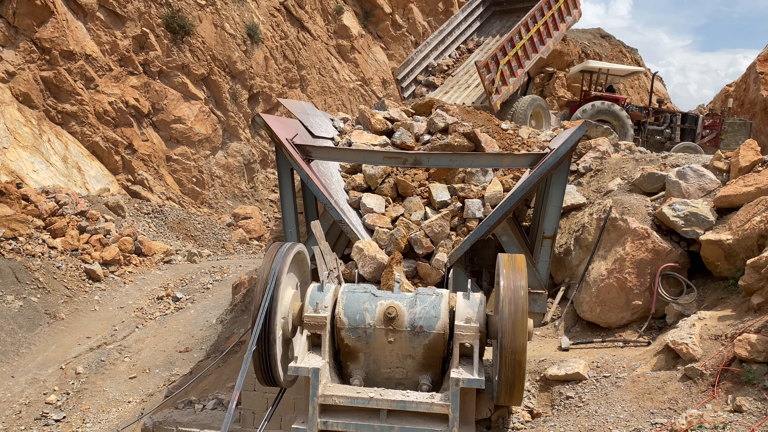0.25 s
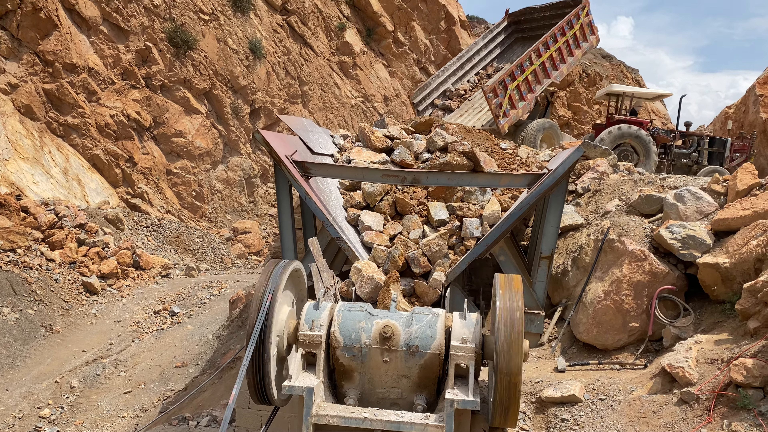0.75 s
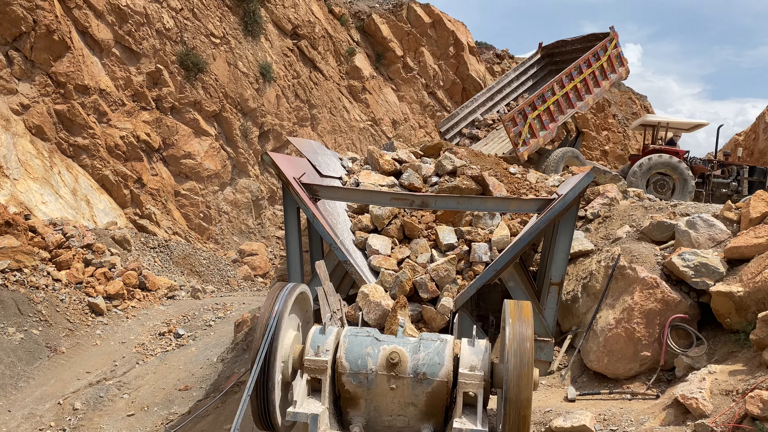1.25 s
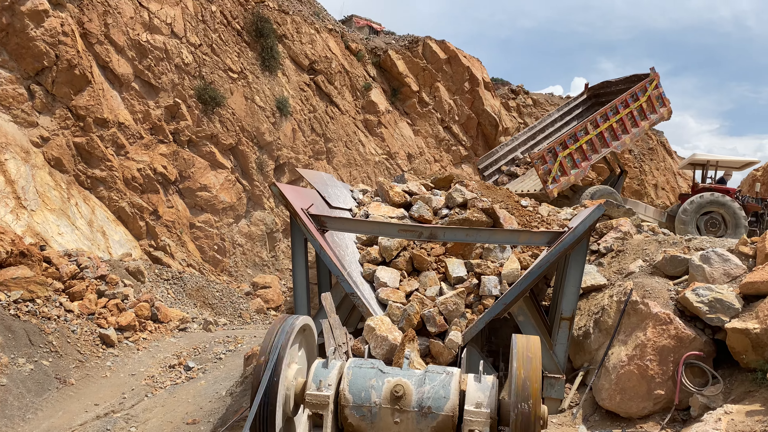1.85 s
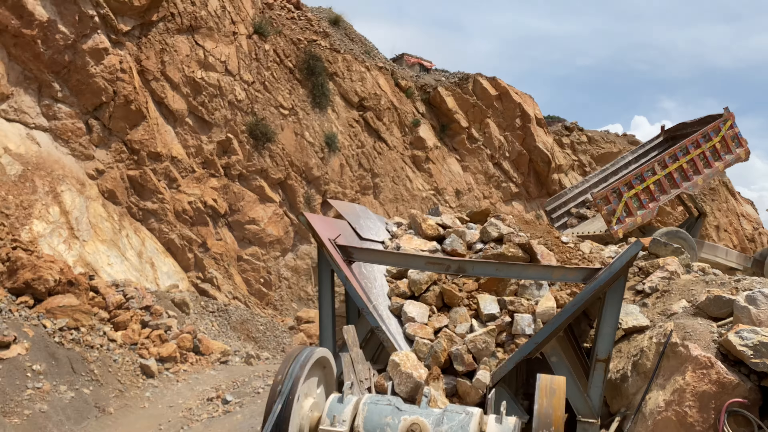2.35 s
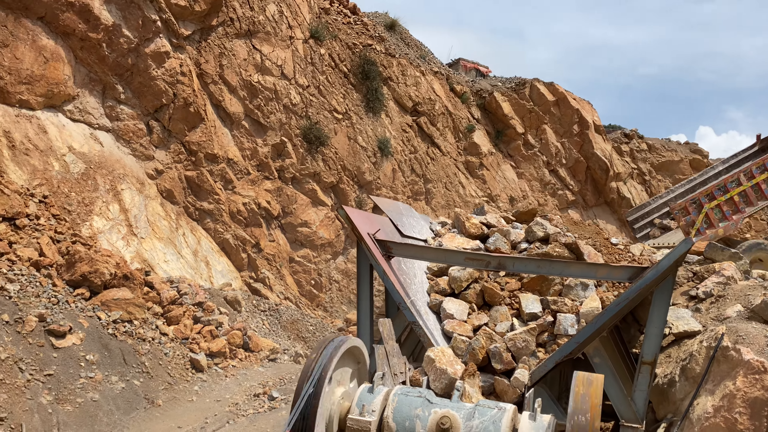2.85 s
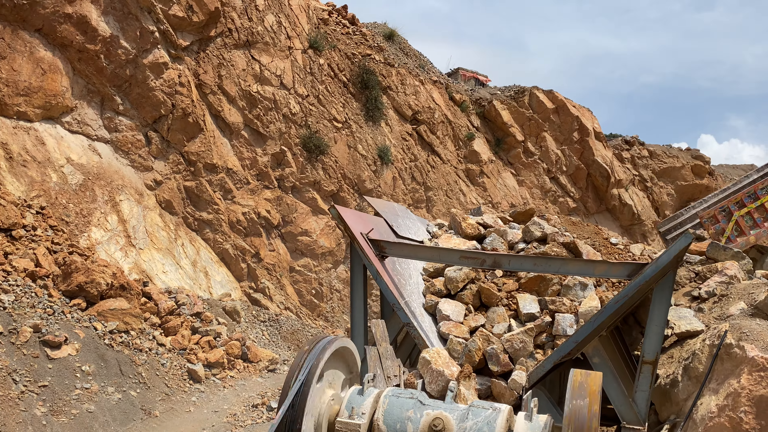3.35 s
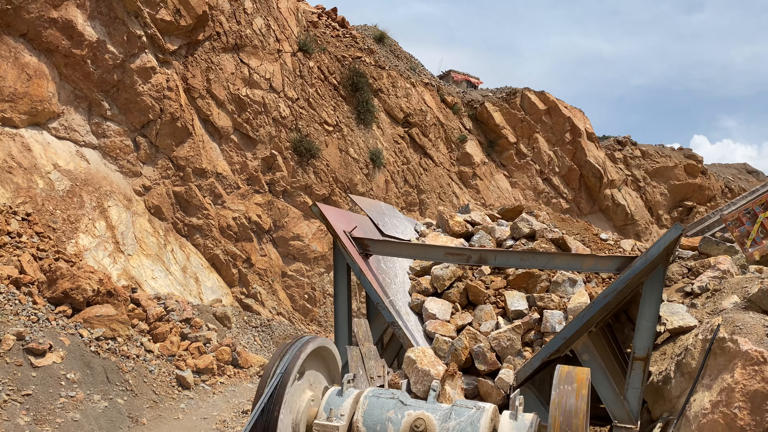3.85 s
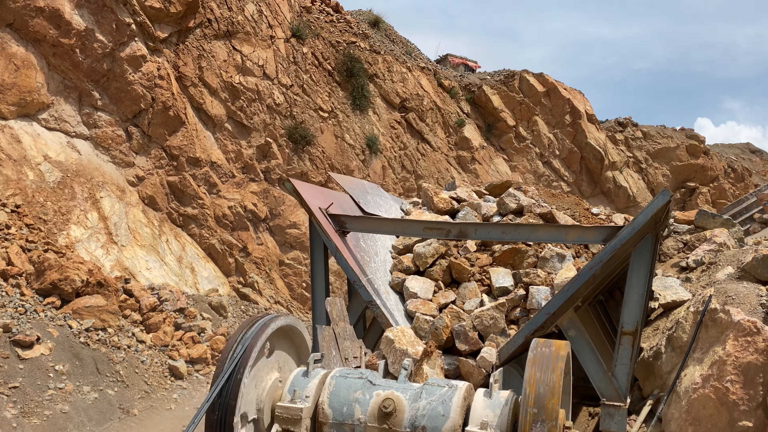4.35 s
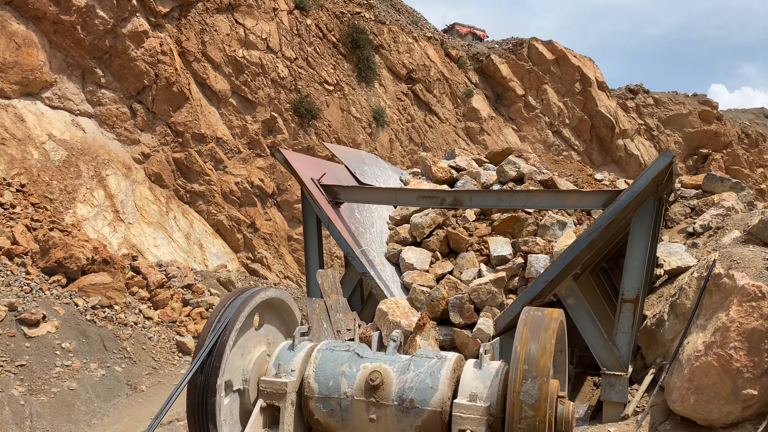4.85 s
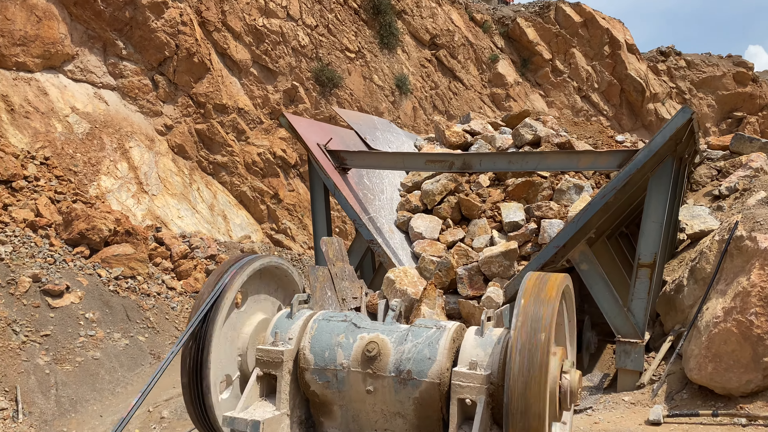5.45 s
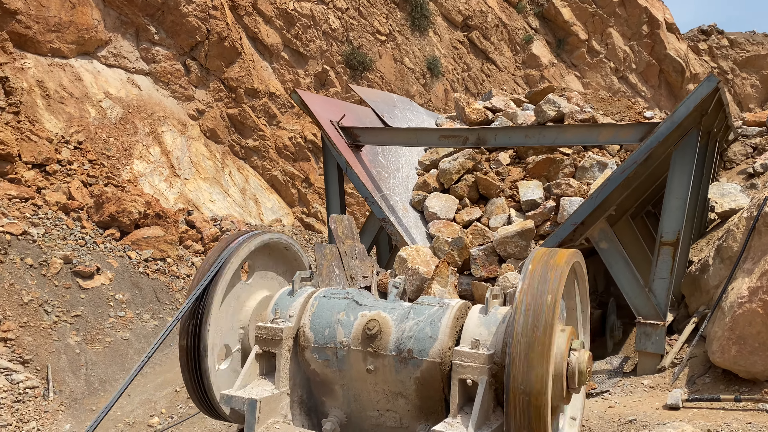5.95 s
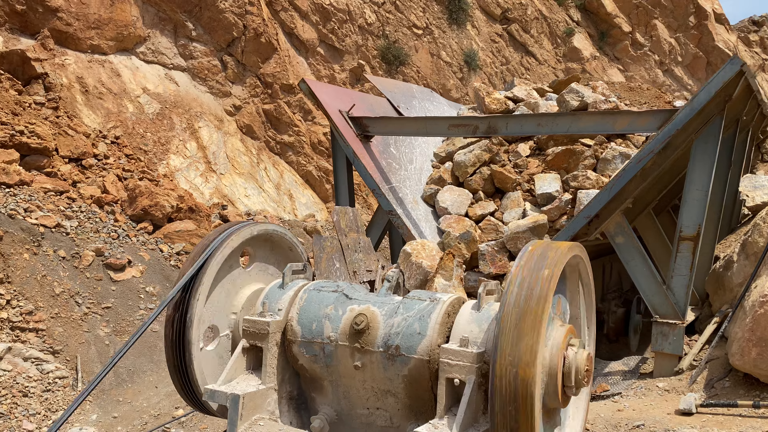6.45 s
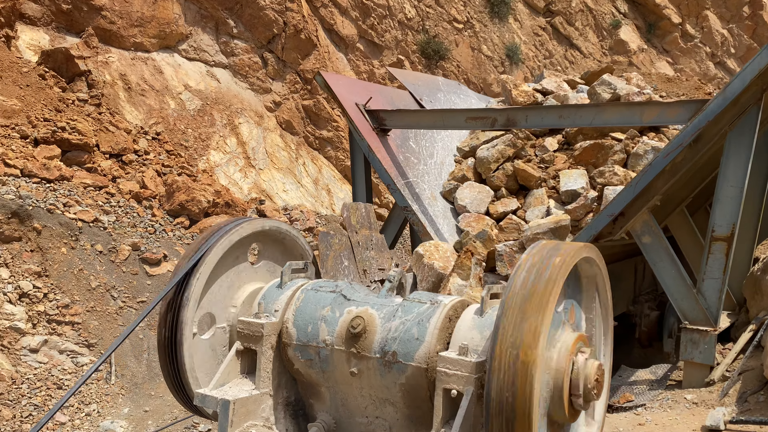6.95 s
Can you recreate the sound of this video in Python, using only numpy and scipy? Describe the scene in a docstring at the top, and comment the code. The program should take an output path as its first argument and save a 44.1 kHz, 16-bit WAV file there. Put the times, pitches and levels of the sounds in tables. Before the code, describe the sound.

Stone crunches and cracks in a running jaw crusher, about four strokes a second, over rumbling machinery that draws gradually nearer.

```python
"""A jaw crusher chews rock in an open quarry, four strokes a second, as the listener draws nearer.
Stone crunches between the steel jaws and rings the frame, and boulders take heavy blows.
Rocks crack, burst or knock, and a loose plate clinks. With each stroke the machine ticks and grit hisses.
Underneath, the flywheels and frame shake the ground while the motor and belts hum and whine."""
import sys
import numpy as np
from scipy import signal
from scipy.fft import rfft, irfft, next_fast_len
from scipy.io import wavfile
from scipy.ndimage import uniform_filter1d

SR = 44100
rng = np.random.default_rng(int(sys.argv[2]) if len(sys.argv) > 2 else 0)


def generate_wav(sig):
    """Save sig (samples, or channels by samples) to the path in sys.argv[1] as 16-bit PCM at SR."""
    pcm = np.round(np.clip(np.atleast_2d(sig).T, -1, 1) * 32767).astype(np.int16)
    wavfile.write(sys.argv[1], SR, pcm)


N = 317079  # samples, about 7.2 seconds
PATH_TURNS = np.array([[0], [.25]])  # sound takes two paths; a ring arrives a quarter cycle apart


# Jaw strokes, biting early_s before time_s: time_s, rasp_db, early_s, crunch_db, boom_db, grit_db
JAW_STROKES = [(0.12, -36.5, 0.036, -21, -23, -39), (0.369, -38, 0.0011, -21, -22, -31),
               (0.62, -36, 0.051, -25.5, -21.5, -28), (0.87, -39, 0.031, -22.5, -19.5, -30),
               (1.13, -40, 0.046, -24, -20, -30.5), (1.37, -42, 0.034, -24, -23.5, -31.5),
               (1.62, -38.5, 0.025, -20.5, -16.5, -29), (1.869, -36, 0.013, -20, -22, -30),
               (2.1, -39, -0.0072, -18.5, -23, -41), (2.36, -39, 0.028, -24.5, -19, -31),
               (2.61, -39, 0.0091, -21, -23.5, -31.5), (2.86, -44, 0.046, -19.5, -19.5, -28.5),
               (3.1, -39, 0.037, -22, -20.5, -34), (3.35, -38, 0.017, -30, -20.5, -29),
               (3.59, -38.5, 0.0019, -21.5, -20, -30.5), (3.841, -38, 0.015, -25, -20, -29.5),
               (4.09, -40, 0.013, -22.5, -21.5, -30), (4.34, -43, 0.034, -22.5, -24, -28.5),
               (4.58, -38.5, 0.025, -20.5, -19, -30), (4.82, -38, 0.023, -26, -17, -35),
               (5.079, -39, 0.033, -19.5, -19, -26.5), (5.32, -39, 0.026, -18.5, -17, -34),
               (5.56, -38.5, 0.014, -30, -23, -30), (5.82, -41, 0.012, -17.5, -15, -28),
               (6.06, -38, 0.022, -18.5, -19.5, -29), (6.31, -39, 0.0096, -18.5, -15.5, -31),
               (6.53, -37.5, 0.0025, -32, -15.5, -36), (6.789, -38, 0.02, -18.5, -17, -31),
               (7.05, -41, 0.043, -20.5, -27, -29.5)]
# Tone of breaking stone: frequency_hz, level_db
CRUNCH_TONE = [(250, -12), (420, -5), (550, 0.5), (800, -1.5), (1200, -9), (1600, -19.5), (2500, -52),
               (6000, -90)]
# Tone of the deep boom of a bite: frequency_hz, level_db
BOOM_TONE = [(90, -8), (140, -4.5), (200, 0), (300, -4.5), (420, -7.5), (520, -11.5), (800, -62),
             (2000, -90)]
# Force that shakes the frame: frequency_hz, level_db
FRAME_FORCE = [(60, -35), (150, 15), (1500, 2), (4000, -13.5), (9000, -80)]
# Notes of the steel frame and hopper: pitch_hz, width_hz, far_db, near_db
FRAME_NOTES = [(154.5, 48, -11.5, -18), (216.4, 24, -16, -13), (270.2, 21.6, -6.5, -8.5),
               (403, 42, -24, -5.5), (538, 20, -26, -10), (775, 35, -9, -56), (917, 9.8, -88, -6.5),
               (1120, 140, -36, -9.5)]

def jaw_crunch():
    """Stone breaks between the jaws and rings the steel frame."""
    time_s, _, early_s, crunch_db, boom_db, _ = np.transpose(JAW_STROKES)
    boom = swell("boom", time_s - early_s, boom_db, build_s=0.038, release_s=0.05)
    crush = swell("crunch", time_s - early_s, crunch_db, build_s=0.057, release_s=0.037)
    chunks = gain_of(-4) * grains(CRUNCH_TONE, per_s=800, spread_db=3.8, fade_s=0.34)
    chunks += gain_of(-9) * pebbles(CRUNCH_TONE, low_hz=399.3, high_hz=1706, spread_db=3.9, width_hz=22.3)
    shake = grains(FRAME_FORCE, per_s=800, spread_db=1.7, fade_s=0.041)
    steel = np.zeros((2, N))
    for k, (hz, width_hz, far_db, near_db) in enumerate(FRAME_NOTES):
        push = boom if k < 4 else crush  # the four lowest notes follow the boom
        steel += push * gain_of(by_distance(far_db, near_db)) * evened(ring(shake, hz, width_hz))
    thuds = grains(BOOM_TONE, per_s=800, spread_db=4.4, fade_s=0.17)
    return boom * thuds + crush * chunks + steel


# Heavy blows on boulders: start_s, level_db, pitch_hz, crush_db, fade_s
BOULDER_BLOWS = [(0.068, -13, 232, -10, 0.091), (.324, -14, 168, -15, .2), (.584, -7.5, 246, -13.5, 0.25),
                 (.768, -16, 291, -17, 0.22), (1.056, -14.5, 272.4, -10, 0.41), (1.304, -19, 169, -1, 0.3),
                 (1.332, -8, 292, -20, 0.091), (1.438, -13, 177, -24, 0.23), (1.826, -17.5, 254, 2, 0.11),
                 (2.084, -1.5, 261, -16, 0.22), (2.125, -15, 252, -23, 0.3), (2.33, -11, 256, -22, 0.23),
                 (2.586, -3, 255, -17, 0.084), (2.805, -9.5, 268, -12, 0.18), (3.021, -12, 228, -10, 0.16),
                 (3.073, -6.5, 139, -11, 0.12), (3.106, -11, 261, -23, 0.11), (3.331, -7, 115, -25, 0.07),
                 (3.313, -16, 270, -4, 0.14), (3.549, -11.5, 254, -9.5, 0.17), (3.76, -10.5, 233, -14, 0.1),
                 (3.798, -7, 211, -8.5, 0.095), (3.838, -12, 134, -28, 0.062), (3.994, -12, 383, -8, 0.12),
                 (4.059, -12, 283, -7, 0.091), (4.292, -6.5, 221, -9.5, 0.095),
                 (4.514, -20, 231, -2.5, 0.18), (4.783, -13, 230, -12, 0.43),
                 (4.913, -11, 156.3, -21, 0.16), (4.98, -13, 382, -5, 0.1), (5.064, -2.5, 247, -13, 0.07),
                 (5.074, 3.5, 100, -30, 0.1), (5.129, -14.5, 221, -11, 0.23), (5.245, -10, 550, -19, 0.11),
                 (5.305, -14.5, 230, -19, .16), (5.478, -7.5, 203, -14, 0.14),
                 (5.533, -6, 261.6, -13.5, 0.23), (5.614, -9, 151, -19, 0.19), (5.881, -13, 272, -18, 0.15),
                 (5.937, -14.5, 246, -10, 0.33), (6.03, -14.5, 262, -21, 0.84),
                 (6.235, -3, 289, -12, 0.073), (6.374, -18.5, 328, -0.5, 0.3),
                 (6.503, -9.5, 530, 1.5, 0.086), (6.54, -11, 553, -19, 0.12), (6.598, -16, 404, -22, 0.15),
                 (6.714, -19, 229, 3, 0.12), (6.751, -15, 290, -8, 0.13), (6.786, -6, 226, -12, 0.13)]
# Tone of stone crushed by a blow: frequency_hz, level_db
CRUSH_TONE = [(150, -41), (400, -4), (800, 0), (1300, -1), (2000, -12.5), (4000, -36), (9000, -80)]

def boulder_blows():
    """The force builds over a few milliseconds, rings a low note of the jaw and crushes stone."""
    out, t = np.zeros((2, N)), np.arange(6000) / SR
    for start_s, level_db, hz, crush_db, fade_s in BOULDER_BLOWS:
        swing = np.sin(2 * np.pi * (hz * t + PATH_TURNS))
        thud = (1 - np.exp(-t / 0.0037)) * fade(t, fade_s) * swing
        crush = gain_of(crush_db) * puff(CRUSH_TONE, 0.0031, 1.25 * fade_s, len(t))
        add(out, start_s, gain_of(level_db) * (thud + crush))
    return out


# Notes of a struck stone: pitch_ratio, strength
STONE_NOTES = [(0.698, 0.3), (.85, 0.26), (0.996, 1), (1.079, 0.41), (1.33, 0.25), (1.6, 0.37)]
# Notes of the loose plate: pitch_hz, level_db, fade_s
PLATE_NOTES = [(2110, -12, .1), (2800, 0, 0.11), (3300, -2, 0.1), (3550, -1, 0.11), (3750, -4, 0.08),
               (4130, 0, 0.08), (5310, 0, 0.15), (5440, -1, 0.1)]

def crack(hz, tilt_db, clink_db, ring_db, rise_s, fade_s, tone, clear_db):
    """One rock snaps, rings briefly and sets the loose plate rattling."""
    t = np.arange(4800) / SR
    tilted = [(f, db + tilt_db * np.log2(f / 2500)) for f, db in tone]
    sharp_front = 1 + .5 * np.exp(-t / 0.00039)
    snap = puff(tilted, rise_s, fade_s, len(t)) * sharp_front
    rough = sum(strength * ring(snap, hz * ratio, width_hz=330) for ratio, strength in STONE_NOTES)
    rough *= np.std(snap) / np.std(rough)
    clear = sum(strength * gain_of(tilt_db * np.log2(ratio)) * note(hz * ratio, t)
                for ratio, strength in STONE_NOTES)
    clear *= gain_of(clear_db) * np.minimum(t / rise_s, 1) * fade(t, fade_s / 2)
    rock = snap + gain_of(ring_db) * (rough + clear)
    phases = 2 * np.pi * rng.random((len(PLATE_NOTES), 2, 1))
    # the plate sits and is hit a little differently each time
    nudges = rng.standard_normal((len(PLATE_NOTES), 2)) * (2.5, .008)
    clink = np.zeros((2, len(t)))
    for (plate_hz, db, ring_s), phase, (nudge_db, detune) in zip(PLATE_NOTES, phases, nudges):
        swing = np.sin(2 * np.pi * plate_hz * (1 + detune) * t + phase)
        clink += gain_of(db + nudge_db) * fade(t, ring_s) * swing
    wobble = evened(uniform_filter1d(rng.standard_normal(len(t)), size=150))
    rattle = np.minimum(t / 0.0019, 1) * (1 + 0.49 * np.tanh(wobble))
    return gain_of(-9.5) * rock + gain_of(clink_db) * rattle * clink


# Rocks that split: start_s, level_db, pitch_hz, tilt_db_per_octave, clink_db
ROCK_SPLITS = [(0.0672, -23, 3040, -4, -28), (0.1215, -23.5, 3280, -3, -9), (0.3726, -21.5, 2960, -1, -16),
               (0.796, -17.5, 1940, -16, -27), (0.8236, -18.5, 2110, -7, -32),
               (0.878, -21.5, 1920, -3, -31), (1.0635, -23, 1930, -9, -19),
               (1.1516, -19.5, 2260, -5.5, -31), (1.3105, -24, 3700, -2, -30), (1.404, -37, 2200, -4, -30),
               (1.5277, -20, 2100, -5.5, -27), (1.816, -17, 2210, -17, -30), (2.0067, -17.5, 1920, -5, -35),
               (2.0737, -14.5, 3610, -5.5, -28), (2.2751, -24.5, 2470, -2, -25),
               (2.5189, -22.5, 2500, -3, -28), (2.584, -30, 2460, 2, -26), (2.835, -28, 2430, 6, -33),
               (3.069, -18.5, 3280, -10, -30), (3.288, -15, 2506, -9, -32), (3.5515, -19, 1890, -3, -31),
               (3.802, -27, 1990, -2, -7.5), (4.187, -20.5, 1890, -6, -32), (4.3134, -21.5, 1880, -3, -31),
               (4.4849, -16.5, 2190, -5.5, -31), (4.522, -24, 2030, -7, -33), (4.7927, -23, 2740, -8, -16),
               (4.932, -23, 2260, -2, -24), (5.062, -30, 1980, 8, -27), (5.228, -20.5, 3340, -5, -19),
               (5.4784, -20, 2360, -5.5, -14), (5.726, -14, 2320, -21, -17), (5.7853, -18, 2080, -7, -25),
               (6.02, -21, 2650, -8, -30), (6.221, -19, 2060, -4.5, -19), (6.24, -15, 3740, -9, -28),
               (6.364, -17, 2110, -3.5, -25), (6.4632, -19, 2300, -5, -22), (6.4953, -14, 2140, -5.5, -21),
               (6.6368, -21.5, 2123, -2.5, -15), (6.711, -26, 2350, -5, -7), (6.7622, -18.5, 2140, -3, -11),
               (6.9024, -17.5, 2110, -10, -13), (6.953, -20.5, 2100, -3, -16),
               (7.027, -15, 1960, -3.5, -15), (7.088, -13.5, 2670, -9, -30), (7.171, -16, 2100, -2.5, -13)]
# Tone of a split: frequency_hz, level_db
SPLIT_TONE = [(300, -36), (800, -3), (1500, -1), (3000, -3), (5000, 0.5), (7000, -6.5), (11000, -10.5),
              (16000, -57)]
# Rocks that burst: start_s, level_db, pitch_hz, tilt_db_per_octave, clink_db, ring_db,
# rise_s, fade_s, splinters_db, treble_db
ROCK_BURSTS = [(0.9135, -12.5, 2870, -3, -41, -1.5, 0.003, 0.31, -32, -22),
               (3.2089, -12, 2635, -2, -34, 3, 0.001, 0.22, -33, -18),
               (3.9092, -9.5, 2600, 1, -25, 0, 0.0011, 0.11, -23.5, 3)]
# Tone of a burst: frequency_hz, level_db
BURST_TONE = [(600, -40), (1200, 1), (1900, 0), (3000, -5), (5000, -4), (7000, -11.5), (11000, -8.5),
              (16000, -57)]

def rock_cracks():
    """Many rocks split in the jaws, and a few burst."""
    out = np.zeros((2, N))
    for start_s, level_db, *rock in ROCK_SPLITS:
        split = crack(*rock, ring_db=-4, rise_s=0.00031, fade_s=0.33, tone=SPLIT_TONE, clear_db=0)
        add(out, start_s, gain_of(level_db) * split)
    for start_s, level_db, *rock, _, _ in ROCK_BURSTS:
        add(out, start_s, gain_of(level_db) * crack(*rock, tone=BURST_TONE, clear_db=-5.5))
    return out


# Short pitched knocks: start_s, level_db, pitch_hz, fade_s
SHORT_KNOCKS = [(0.1274, -22, 2250, 0.044), (0.773, -23, 3280, 0.05), (0.917, -19, 2010, 0.08),
                (0.92, -17.5, 1325, 0.12), (0.921, -20, 3120, 0.07), (3.9095, -17, 4100, 0.046),
                (3.909, -13, 2600, 0.06), (3.2093, -11, 1850, 0.07), (3.911, -21, 6500, 0.04),
                (3.916, -18, 2230, 0.06), (1.065, -26, 2760, 0.037), (1.278, -18, 2260, 0.05),
                (1.4042, -15, 2090, 0.054), (1.779, -18, 2240, 0.046), (2.272, -19, 2450, 0.05),
                (2.7655, -20, 2330, 0.05), (3.0126, -21, 2320, 0.05), (3.5044, -29, 2270, 0.043),
                (3.9988, -21, 2144, 0.05), (4.241, -16, 2256, 0.046), (4.484, -24, 2156, 0.044),
                (4.7345, -18, 2330, 0.054), (4.9152, -19, 2230, 0.035), (5.479, -14.5, 2305, 0.059),
                (5.9694, -18, 2480, 0.05), (6.3292, -27, 2210, 0.045), (6.464, -21, 2360, 0.05),
                (6.7113, -25, 4240, 0.06), (5.365, -24, 2980, 0.07), (5.4275, -21, 2230, 0.07),
                (5.526, -19, 1600, 0.07), (5.674, -24, 1730, 0.064), (5.871, -26, 2000, 0.08),
                (5.924, -17, 1585, 0.088), (5.997, -19, 1740, 0.08), (6.084, -14, 1500, 0.091),
                (6.13, -17, 1750, 0.05), (6.299, -18, 1660, 0.08), (6.573, -21, 1550, 0.08),
                (6.94, -21, 2100, 0.08), (6.973, -24, 2780, 0.1), (7.009, -21, 1570, 0.08),
                (7.045, -19, 2120, 0.08), (7.115, -23, 2710, 0.15), (0.072, -8, 746, 0.088),
                (0.525, -10, 610, 0.063), (0.586, -18, 670, 0.11), (1.011, -11, 580, 0.074),
                (1.31, -12.5, 1206, 0.064), (1.329, -11, 540, 0.096), (1.349, -10, 860, 0.068),
                (1.552, -8, 369, 0.095), (2.092, -8, 900, 0.1), (2.11, -12, 530, 0.09),
                (2.316, -9, 403, 0.11), (2.574, -10, 843, 0.086), (3.069, -17, 390, 0.088),
                (3.552, -15, 784, 0.08), (3.8, -6.5, 826, 0.07), (3.803, -16, 1340, 0.063),
                (4.289, -13, 580, 0.062), (4.79, -11, 400, 0.08), (5.028, -8, 405, 0.11),
                (5.062, -10, 910, 0.06), (5.078, -9, 546, 0.065), (5.78, -13, 920, 0.09),
                (5.799, -7.5, 742, 0.099), (5.829, -6, 620, 0.08), (6.192, -20, 561, 0.07),
                (6.239, -0.5, 404, 0.068), (6.489, -12, 586, 0.088), (6.552, -1, 590, 0.054),
                (6.829, -9, 550, 0.061), (6.919, -7.5, 450, 0.13)]

def short_knocks():
    """The machine ticks each stroke, bursting rocks ring, stones knock: brief notes in puffs of noise."""
    out, t = np.zeros((2, N)), np.arange(2400) / SR
    for start_s, level_db, hz, fade_s in SHORT_KNOCKS:
        clear = sum(strength * note(hz * ratio, t) for ratio, strength in STONE_NOTES)
        noise = evened(ring(rng.standard_normal((2, len(t))), hz, 0.4 * hz))
        loudness = gain_of(level_db) * np.minimum(t / .0025, 1) * fade(t, fade_s)
        add(out, start_s, loudness * (gain_of(-6.5) * clear + gain_of(-12) * noise))
    return out


# Tone of sliding gravel: frequency_hz, level_db
GRAVEL_TONE = [(900, 2), (1400, 3.5), (2000, 2), (3000, -2.5), (4500, -6), (5800, -8.5), (7000, -52),
               (9000, -50), (14000, -80)]
# Tone of dust and splinters: frequency_hz, level_db
DUST_TONE = [(4500, -17), (6300, 1.5), (7000, 0), (9000, -4), (11000, -4.5), (13000, -7.5), (15000, -9.5),
             (17000, -41)]

def sliding_grit():
    """Gravel tumbles and slides with each stroke; the finest dust rasps on the jaw plates."""
    time_s, rasp_db, early_s, _, _, grit_db = np.transpose(JAW_STROKES)
    gravel = grains(GRAVEL_TONE, per_s=1700, spread_db=0.45, fade_s=0.057)
    gravel += gain_of(-9.5) * pebbles(GRAVEL_TONE, low_hz=891.4, high_hz=5985, spread_db=3, width_hz=30.6)
    dust = grains(DUST_TONE, per_s=2200, spread_db=0.73, fade_s=0.061)
    # the highest hiss grows duller as time goes on
    dull = colour(dust, lambda hz: 1 / np.sqrt(1 + (hz / 12000) ** 8))
    dust = dull + gain_of(by_distance(-.7, -27)) * (dust - dull)
    slide = swell("grit", time_s - early_s, grit_db, build_s=0.049, release_s=0.056)
    rub = swell("rasp", time_s, rasp_db - 6, build_s=0.067, release_s=0.023)
    return slide * gravel + rub * dust


# The two hisses in every stroke: early_s, above_rasp_db
STROKE_HISSES = [(0.017, 6.5), (0.0078, 2.5)]
# Tone of the highest part of a hiss: frequency_hz, level_db
TREBLE_TONE = [(9000, -40), (11500, 3), (13000, 7), (15000, -4), (17000, -12)]

def splinters():
    """Fine splinters hiss twice a stroke and when a rock bursts; the highest treble dies sooner."""
    out = np.zeros((2, N))
    stroke_treble_db = by_distance(-13, -10)
    hisses = [(time_s - early_s, 0.0096, 0.14, rasp_db + above_db, stroke_treble_db[round(time_s * SR)])
              for time_s, rasp_db, *_ in JAW_STROKES for early_s, above_db in STROKE_HISSES]
    for start_s, *_, rise_s, fade_s, level_db, treble_db in hisses + ROCK_BURSTS:
        hiss = puff(DUST_TONE, rise_s, fade_s, samples=3600)
        hiss += gain_of(treble_db) * puff(TREBLE_TONE, rise_s, 0.53 * fade_s, samples=3600)
        add(out, start_s, gain_of(level_db) * hiss)
    return out


# Lumps of ground shaking: time_s, level_db, pitch_hz
GROUND_LUMPS = [(0.158, -26, 118), (0.25, -38, 65.0), (0.381, -20, 127), (0.667, -15, 67.0),
                (0.901, -16.5, 110), (1.12, -23, 65.0), (1.339, -20, 106), (1.47, -16, 94.5),
                (1.631, -19, 111), (1.877, -17, 107), (2.131, -18, 113), (2.2, -19, 83.0), (2.401, -17, 80),
                (2.47, -16.5, 56.5), (2.711, -17, 80.3), (2.941, -26, 71.0), (3.097, -13, 55.7),
                (3.35, -21, 103), (3.501, -24, 67.0), (3.649, -18, 104), (3.84, -16, 102), (4.11, -14, 102),
                (4.408, -25, 91), (4.559, -15.5, 119.5), (4.85, -16, 100), (5.088, -9, 98),
                (5.202, -18, 92.5), (5.359, -16, 117), (5.419, -21, 73.6), (5.642, -17, 77.2),
                (5.829, -14.5, 59.5), (5.899, -15, 85.5), (6.111, -13, 89), (6.389, -8.5, 92),
                (6.588, -11.5, 96), (6.831, -14.5, 108), (7.059, -9, 95)]
# Tone of the rumble: frequency_hz, level_db
RUMBLE_TONE = [(20, -25), (35, -32), (50, 11.5), (65, 12), (100, 11), (130, 7), (160, -6), (220, -68)]

def ground_rumble():
    """Flywheels and frame shake the ground in uneven lumps, each a swell of noise and a brief swing."""
    times_s, levels_db, _ = np.transpose(GROUND_LUMPS)
    loudness = swell("rumble", times_s, levels_db - 7.5, build_s=0.028, release_s=0.058)
    out = loudness * grains(RUMBLE_TONE, per_s=200, spread_db=0.96, fade_s=1.0)
    t = np.arange(-4000, 4000) / SR
    hump = np.exp(-(t / 0.029) ** 2)
    for time_s, level_db, hz in GROUND_LUMPS:
        swing = np.sin(2 * np.pi * (hz * t + rng.random((2, 1))))
        add(out, time_s + t[0], gain_of(level_db) * hump * swing)
    return out


# Humming notes of the motor and belts: pitch_hz, width_hz, far_db, near_db
HUM_NOTES = [(163.7, 6.2, -30, -38), (916, 7.5, -94, -43), (1515, 4.6, -86, -39), (1990, 22, -53, -48)]
# A whine that swells and fades: time_s, pitch_hz, level_db
MOTOR_WHINE = [(0, 630, -33), (.7, 640, -31), (1.3, 637, -44), (2.05, 632, -36), (2.2, 634, -28),
               (3, 643.5, -31.5), (3.7, 660, -38), (4.6, 609, -33), (5.8, 615.6, -31), (7.19, 605, -29)]

def motor_and_belts():
    """Motor and belts hum on a few notes, with a whine that wavers in pitch."""
    noise = rng.standard_normal((2, N))
    hum = np.zeros((2, N))
    for hz, width_hz, far_db, near_db in HUM_NOTES:
        narrow = ring(ring(noise, hz, width_hz), hz, 4 * width_hz)
        hum += gain_of(by_distance(far_db, near_db)) * evened(narrow)
    waver_hz = 13.85 * evened(uniform_filter1d(noise, 3000, axis=1))
    turns = np.cumsum(curve(MOTOR_WHINE, column=1) + waver_hz, axis=1) / SR
    return hum + gain_of(curve(MOTOR_WHINE, column=2)) * np.sin(2 * np.pi * turns)


# Levels between strokes: time_s, rumble_db, boom_db, crunch_db, grit_db, rasp_db
RESTING_LEVELS = [(0.0, -23, -24.5, -26.5, -28.5, -41.5), (0.92, -26.5, -26, -29, -30.5, -43.5),
                  (1.16, -24, -27.5, -31, -31, -43), (1.54, -19, -24.5, -28.5, -30.5, -42.5),
                  (1.86, -32.5, -28.5, -26.5, -30.5, -42.5), (2.18, -27, -26.5, -29.5, -29, -42.5),
                  (2.36, -20.5, -28, -27.5, -32.5, -43), (3.14, -27, -28.5, -25, -29.5, -42.5),
                  (3.7, -24, -26.5, -24.5, -31, -43.5), (4.31, -25, -25, -25, -30, -41),
                  (4.75, -20, -24, -21.5, -29.5, -43), (5.08, -20, -23, -23.5, -29, -39.5),
                  (6.51, -21, -22, -20, -27, -41), (7.19, -21.5, -21.5, -23.5, -29.5, -41)]

def swell(layer, times_s, peaks_db, build_s, release_s):
    """Loudness of a layer: its resting level plus a hump at every event."""
    column = 1 + ["rumble", "boom", "crunch", "grit", "rasp"].index(layer)
    steps = np.arange(0, N, 64)
    t = steps / SR - times_s[:, None]
    humps = gain_of(peaks_db)[:, None] ** 2 * np.exp(-(t / np.where(t < 0, build_s, release_s)) ** 2)
    power = np.interp(np.arange(N), steps, humps.sum(axis=0))
    return np.sqrt(power + gain_of(curve(RESTING_LEVELS, column)) ** 2)


# The listener's approach: time_s, nearness (0 far, 1 close)
APPROACH = [(0, 0.03), (4, 0.27), (5, 0.8), (6, 0.88), (7.19, 0.98)]

def by_distance(far_db, near_db):
    """A level that blends from far to near as the listener closes in."""
    return far_db + (near_db - far_db) * curve(APPROACH, column=1)


def grains(tone, per_s, spread_db, fade_s):
    """Many small impacts of uneven size, each a dying puff of noise."""
    hits = gain_of(spread_db * np.minimum(rng.exponential(1, N), 5)) * (rng.random(N) < per_s / SR)
    power = signal.lfilter([1], [1, -gain_of(-120 / (fade_s * SR))], hits ** 2)
    return shaped(np.sqrt(power + 1e-12) * rng.standard_normal((2, N)), tone)


def pebbles(tone, low_hz, high_hz, spread_db, width_hz, per_s=300):
    """Loose stones knock together, each size ringing briefly on its own pitch."""
    pitches_hz = np.geomspace(low_hz, high_hz, num=11)
    hits = gain_of(spread_db * np.minimum(rng.exponential(1, N), 4)) * (rng.random(N) < per_s / SR)
    hits = hits * rng.choice([-1., 1.], (2, N))
    which = rng.integers(0, len(pitches_hz), N)
    return evened(sum(gain_of(read(tone, hz)) * ring(hits * (which == k), hz, width_hz)
                      for k, hz in enumerate(pitches_hz)))


def puff(tone, rise_s, fade_s, samples):
    """One puff of noise that starts quickly and dies away."""
    t = np.arange(samples) / SR
    return np.minimum(t / rise_s, 1) * fade(t, fade_s) * shaped(rng.standard_normal((2, samples)), tone)


def note(hz, t):
    """A pure note on both paths, starting anywhere in its cycle."""
    return np.sin(2 * np.pi * (hz * t + rng.random() + PATH_TURNS))


def ring(x, hz, width_hz):
    """Makes a sound ring at one pitch; a narrower width rings longer."""
    r, c = np.exp(-np.pi * width_hz / SR), np.cos(2 * np.pi * hz / SR)
    return signal.lfilter([2 * (1 - r), -2 * (1 - r) * r * c], [1, -2 * r * c, r * r], x)


def fade(t, fade_s):
    """Dies away by 60 dB every fade_s seconds."""
    return gain_of(-60 * t / fade_s)


def gain_of(db):
    """Turns decibels into a multiplier."""
    return 10 ** (np.asarray(db) / 20)


def evened(x):
    """Scales a sound to an average power of 1."""
    return x / np.sqrt(np.mean(x ** 2) + 1e-20)


def read(table, hz):
    """Looks up a frequency in a table, blending rows on a pitch scale."""
    row_hz, values = np.transpose(table)
    return np.interp(np.log(hz + 1), np.log(row_hz + 1), values)


def curve(table, column):
    """One column of a time table at every sample."""
    rows = np.asarray(table)
    return np.interp(np.arange(N) / SR, rows[:, 0], rows[:, column])


def colour(x, gain):
    """Turns each frequency up or down by gain(hz)."""
    size = next_fast_len(x.shape[-1])
    return irfft(rfft(x, size) * gain(np.fft.rfftfreq(size, 1 / SR)), size)[..., :x.shape[-1]]


def shaped(noise, tone):
    """Gives noise the tone in a table, at an average power of 1."""
    return evened(colour(noise, lambda hz: gain_of(read(tone, hz))))


def add(mix, start_s, sound):
    """Mixes a sound in at its start time."""
    part = mix[:, round(start_s * SR):][:, :sound.shape[1]]
    part += sound[:, :part.shape[1]]


def scene():
    """The running machine and the rock it breaks, heard along two paths."""
    background = ground_rumble() + motor_and_belts()
    crushing = jaw_crunch() + sliding_grit() + boulder_blows() + rock_cracks()
    return background + crushing + short_knocks() + splinters()


# How alike left and right sound: frequency_hz, likeness (0 to 1)
SIDE_LIKENESS = [(60, 0.96), (170, 0.93), (500, 0.68), (900, 0.6), (1550, 0.19), (1900, 0.41), (2600, 0.76),
                 (4200, 0.9), (5700, 0.4), (6700, 1), (16000, 1)]
# How far the right side runs ahead: frequency_hz, lead_radians
RIGHT_LEAD = [(0, 0), (2200, 0), (3000, .5), (5000, .3), (6000, 0), (7000, 0), (15300, 12.5)]
# How much louder the left side is: frequency_hz, left_minus_right_db
SIDE_BALANCE = [(60, -1.5), (130, 0.5), (290, -2), (640, 1), (1410, 1.5), (3100, 1.0), (6820, 1),
                (15000, -1.5)]

def record(dry):
    """Two microphones share part of the sound, with the treble a little later on the left."""
    def likeness(hz):
        return read(SIDE_LIKENESS, hz)

    def lean(hz):
        return gain_of(read(SIDE_BALANCE, hz) / 2)

    def lead(hz):
        return np.exp(1j * np.interp(hz, *np.transpose(RIGHT_LEAD)))

    left = colour(dry[0], lean)
    shared = colour(dry[0], lambda hz: likeness(hz) * lead(hz) / lean(hz))
    right_only = colour(dry[1], lambda hz: np.sqrt(1 - likeness(hz) ** 2) / lean(hz))
    ceiling, cutoff_hz = .93, 15600
    both = np.array([left, shared + right_only]) / ceiling
    rounded = ceiling * both / (1 + both ** 8) ** (1 / 8)  # softens the loudest peaks
    treble_cut = signal.firwin(511, cutoff_hz, window=("kaiser", 9), fs=SR)
    return signal.oaconvolve(rounded, treble_cut[None], "same")


dry = scene()
out = record(dry)
generate_wav(out)
```